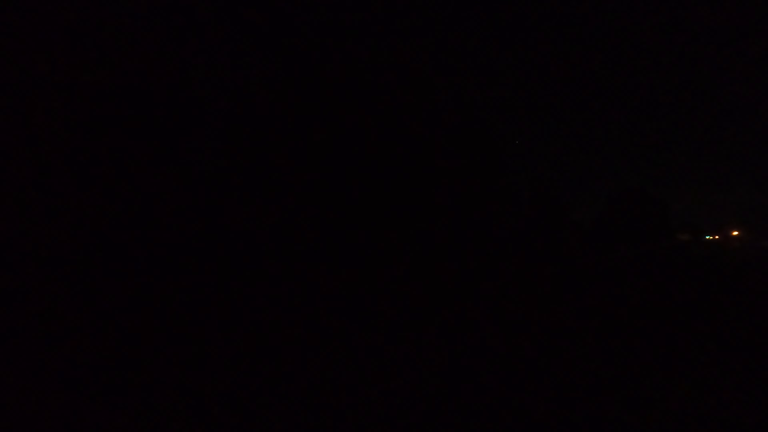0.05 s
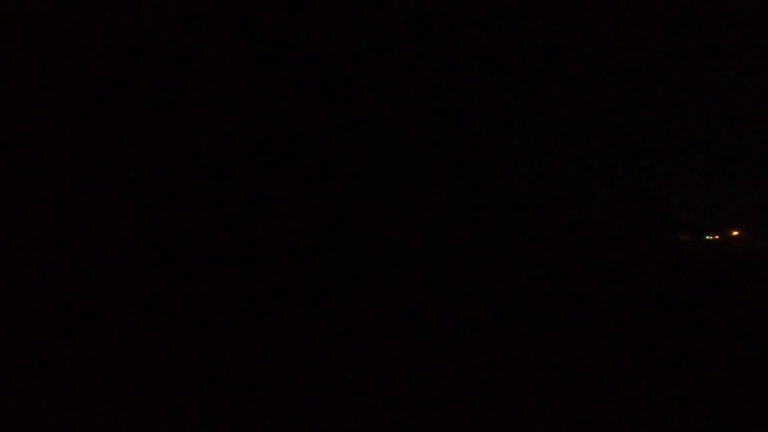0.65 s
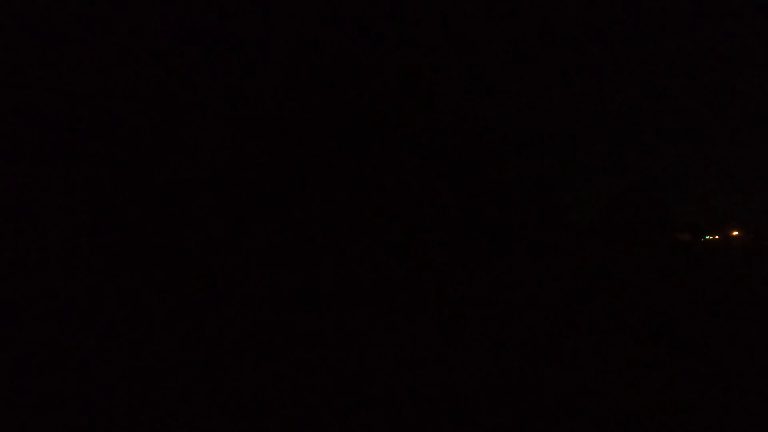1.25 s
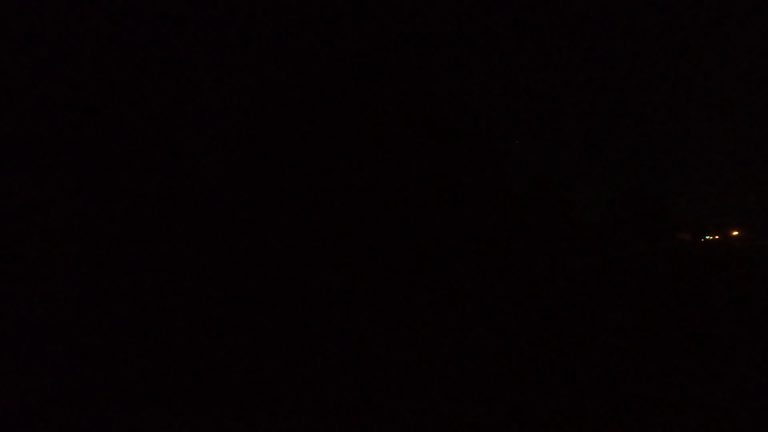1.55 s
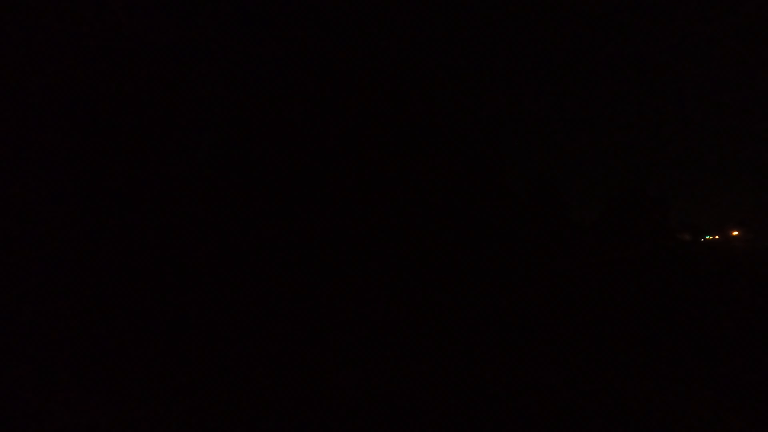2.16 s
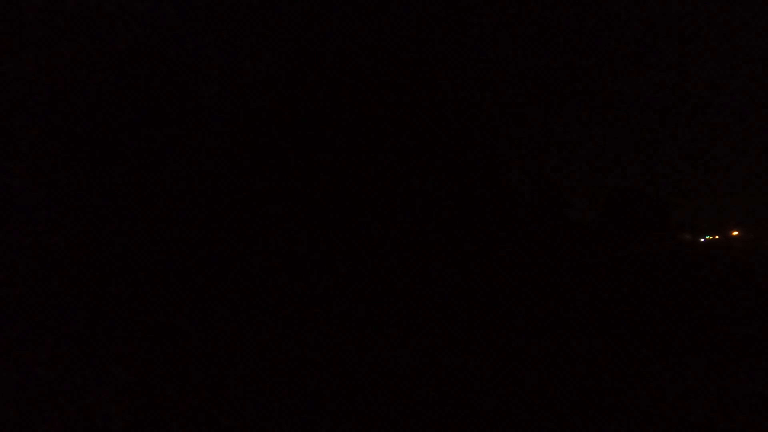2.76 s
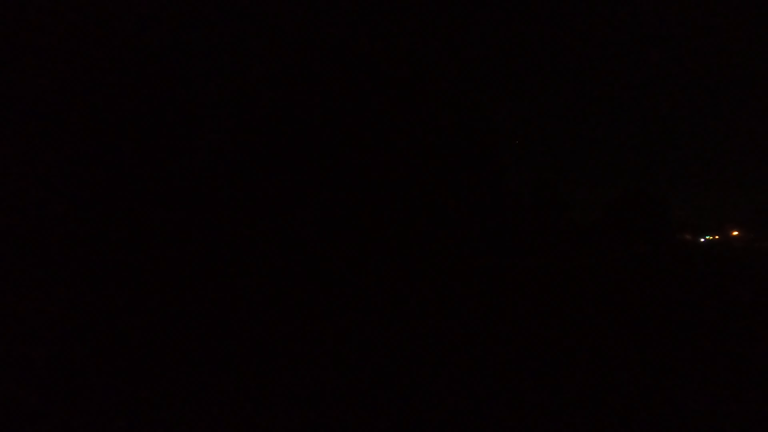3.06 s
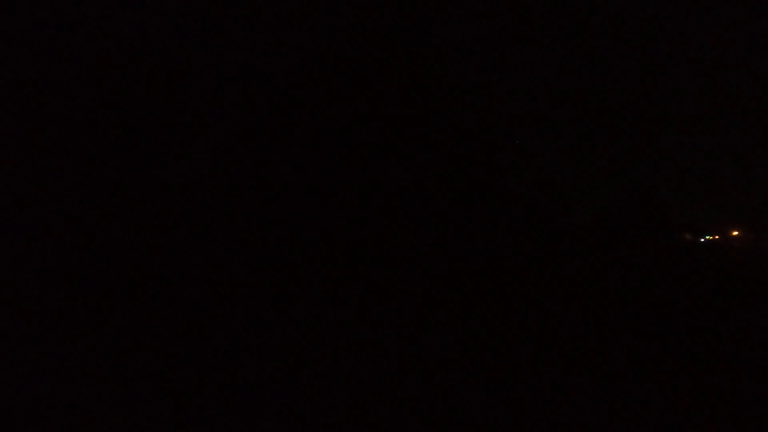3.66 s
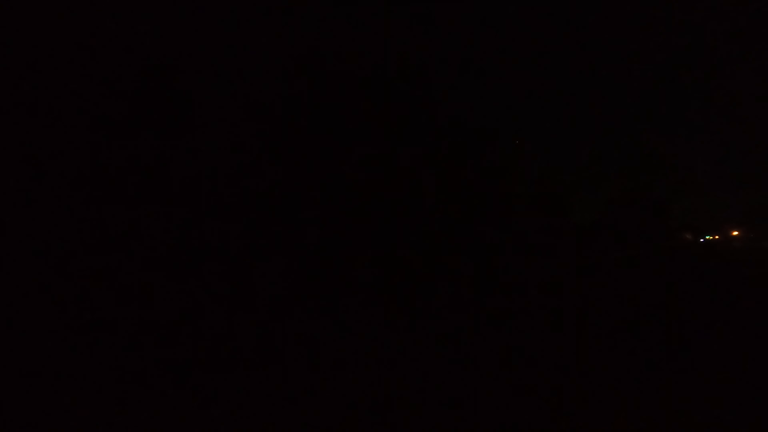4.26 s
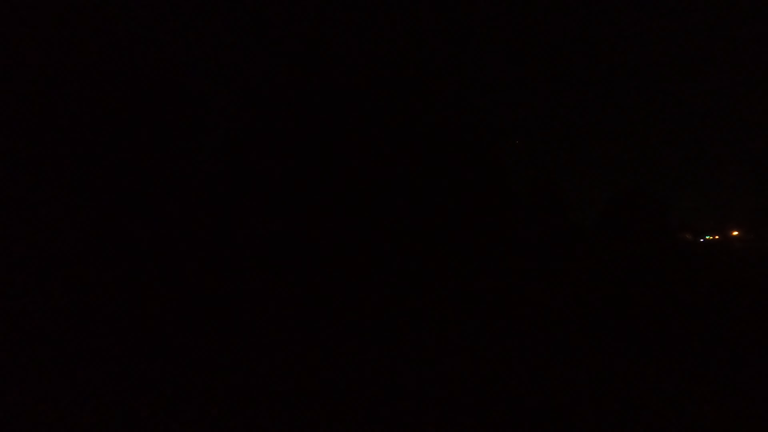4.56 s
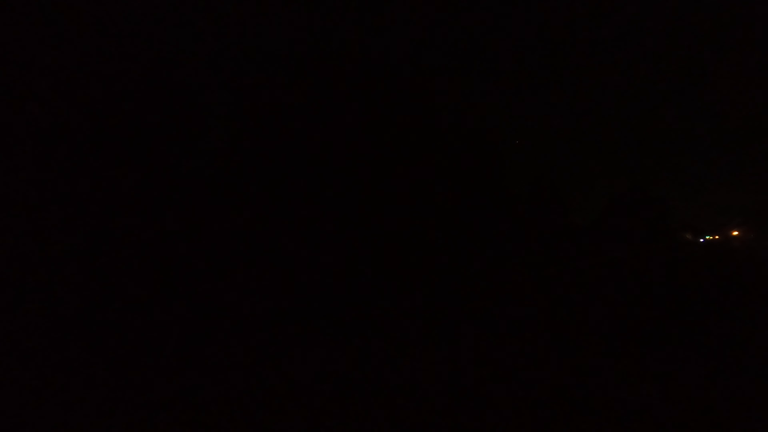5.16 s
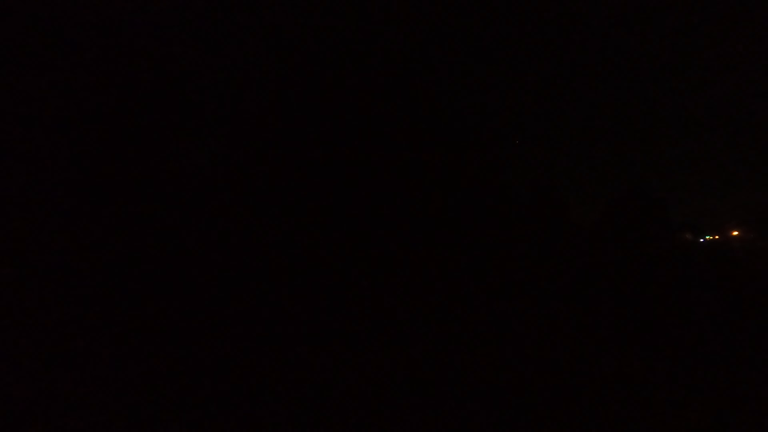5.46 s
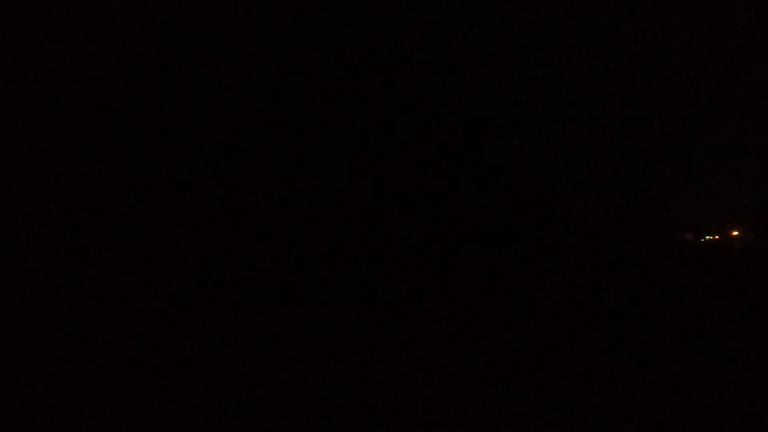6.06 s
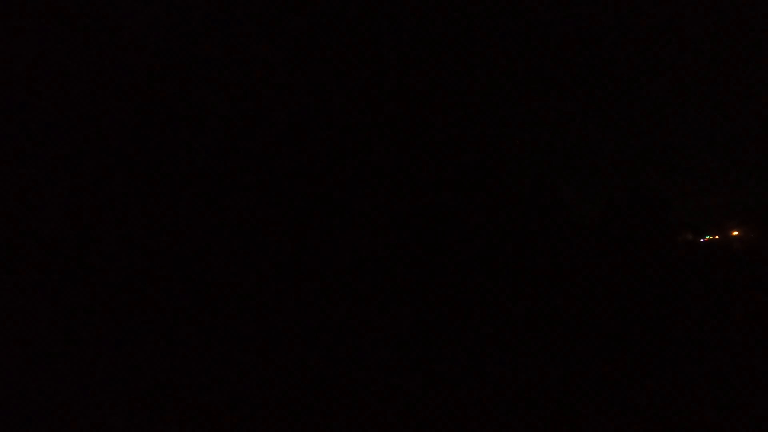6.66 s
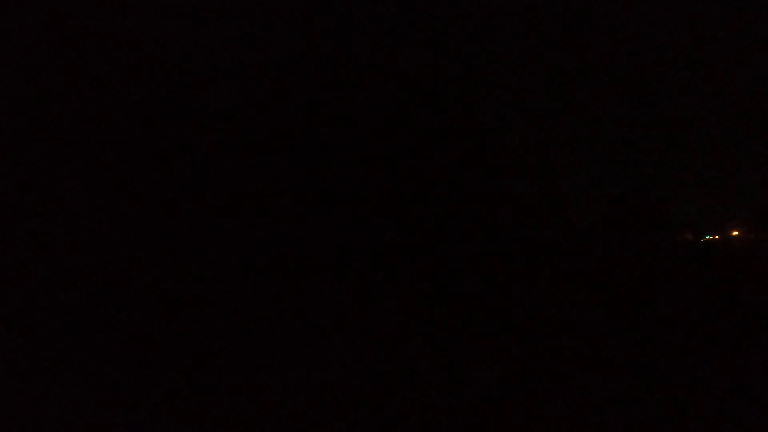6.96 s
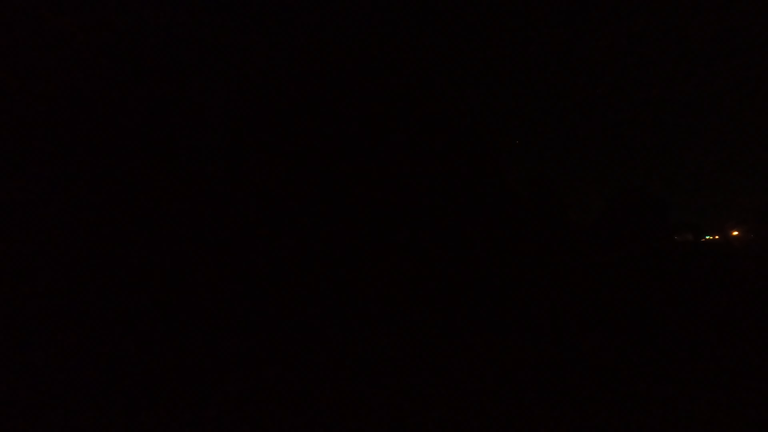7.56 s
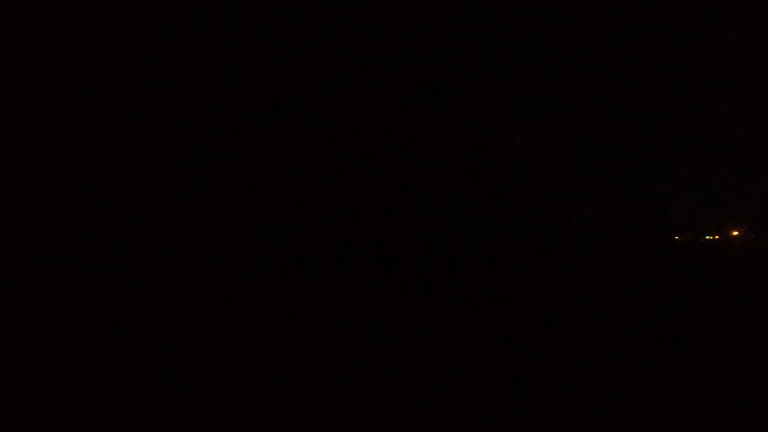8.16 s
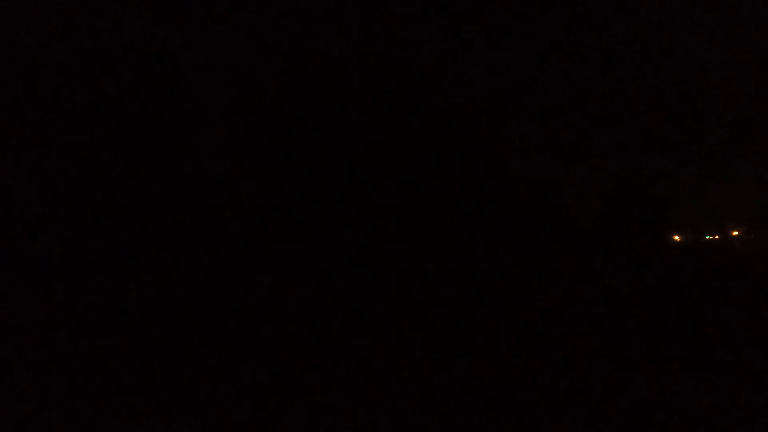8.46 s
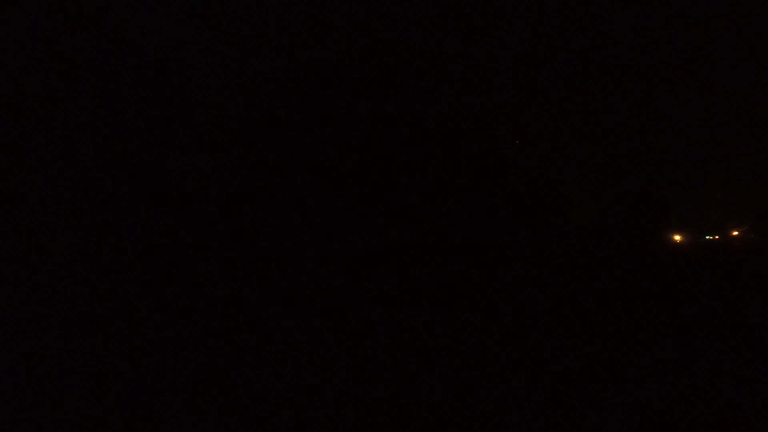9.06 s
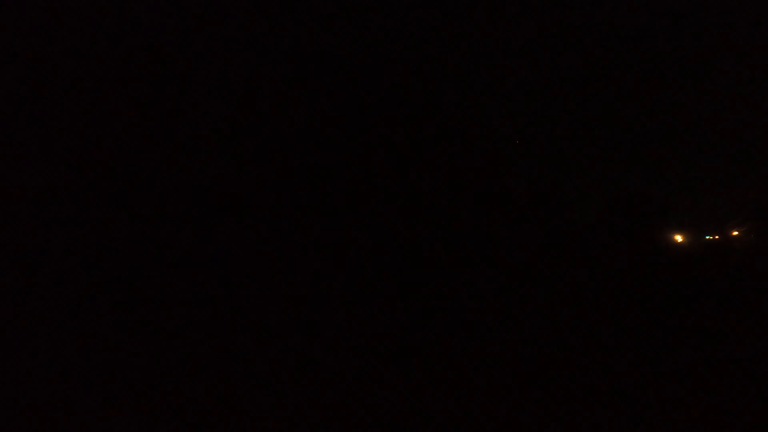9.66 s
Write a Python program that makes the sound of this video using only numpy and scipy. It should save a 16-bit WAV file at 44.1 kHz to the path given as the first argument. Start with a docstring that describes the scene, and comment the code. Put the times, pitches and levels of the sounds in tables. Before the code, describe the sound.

A far train rumbles and hums while the rails hiss ever louder and several crickets chirp in the night.

```python
"""Open country at night: crickets sing while a distant train approaches.
The ground rumbles, wheels roar and moan, engine hum and a far drone fade; the rails hiss ever louder.
Crickets scrape wing on wing: a throbbing far chorus, a faint singer, a near one with long chirps,
and later a raspy one in a quick beat. A faint high sizzle builds; electronics add a thin whine."""
import sys
import numpy as np
from scipy import signal
from scipy.fft import rfft, irfft, next_fast_len
from scipy.io import wavfile

SR = 44100
rng = np.random.default_rng(int(sys.argv[2]) if len(sys.argv) > 2 else 0)


def wav_record(signal):
    """Record a signal, one row per channel, as 16-bit PCM in the file named by sys.argv[1]."""
    frames = np.transpose(np.atleast_2d(signal))
    bounded = np.clip(frames, -1, 1)
    # unit amplitude maps onto the largest positive 16-bit level
    quanta = np.round(bounded * 32767).astype(np.int16)
    wavfile.write(sys.argv[1], SR, quanta)


N = 432621
T = np.arange(N) / SR


def amp(db):
    return 10 ** (np.asarray(db) / 20)


def unit_rms(x):
    return x / np.sqrt(np.mean(abs(x) ** 2) + 1e-24)


def at_hz(points, hz):
    """Curve interpolated on a log-frequency axis."""
    f, value = np.transpose(points)
    return np.interp(np.log(hz + 1), np.log(f + 1), value)


def gain_curve(points):
    """Gain over time, interpolated in dB."""
    times_s, db = np.transpose(points)
    return amp(np.interp(T, times_s, db))


def add(mix, start_s, sound):
    part = mix[max(round(start_s * SR), 0):][:len(sound)]
    part += sound[:len(part)]


def bins_hz():
    """FFT frequencies, padded for tails."""
    return np.fft.rfftfreq(2 * next_fast_len(N // 2 + SR // 2), 1 / SR)


def complex_noise(*shape):
    return rng.standard_normal((*shape, 2)) @ [1, 1j]


def wander(width_hz, t=T):
    """Slow complex random signal of unit power."""
    count = 8192
    hz = np.fft.fftfreq(count, T[-1] / count)
    slow = np.fft.ifft(complex_noise(count) * np.exp(-(hz / width_hz) ** 2))
    return np.interp(t, np.linspace(0, T[-1], count), unit_rms(slow))


def tone(hz, width_hz, t=T, steady=.55):
    """Wavering tone near unit power; steady (0-1) evens out its loudness."""
    waver = wander(width_hz, t)
    waver /= np.sqrt(np.clip(steady * abs(waver) ** 2 + 1 - steady, .05, None))
    phase = 2 * np.pi * np.cumsum(hz * np.ones(len(t))) / SR
    return np.sqrt(2) * (waver * np.exp(1j * phase)).real


# Coherence of the two microphone ports: f/Hz, coherence/0-1
PORT_COHERENCE = [(50, 0.99), (200, 0.96), (500, 1), (1000, 0.87), (1400, .88), (1800, 1), (3300, 0.91),
                  (3900, 0.96), (6500, 0.3)]

def noise(spectrum, modes=(), coherence=PORT_COHERENCE):
    """Partly coherent stereo noise of unit RMS, shaped by a spectrum and resonances."""
    hz = bins_hz()
    modes_db = sum(db / (1 + (2 * (hz - mode_hz) / width_hz) ** 2) for mode_hz, width_hz, db in modes)
    left, other = complex_noise(2, len(hz))
    shared = np.clip(at_hz(coherence, hz), 0, 1)
    right = shared * left + np.sqrt(1 - shared ** 2) * other
    return unit_rms(irfft(np.array([left, right]) * amp(at_hz(spectrum, hz) + modes_db))[:, :N])


def scatter(x, t60_s, delay_s, channels=2):
    """Diffuse echoes off ground and plants, drifting between two sets of paths."""
    t = np.arange(0, delay_s + t60_s, 1 / SR)
    out = 0
    for drift in (np.cos(T), np.sin(T)):
        tail = rng.standard_normal((channels, len(t))) * amp(-60 * t / t60_s) * (t > delay_s)
        wet = signal.oaconvolve(x[None], tail, axes=1)[:, :N]
        out += drift * wet * np.std(x) / np.std(wet, axis=1, keepdims=True)
    return out


# Air and microphone hiss: f/Hz, relative level/dB
AIR_SPECTRUM = [(300, -2.5), (1000, 0), (1500, -1.5), (1900, 0.5), (2500, -11.5), (4200, -17.5),
                (5000, -15.5), (5900, -19.5), (6900, -19), (7600, -19.5), (8000, -29.5), (8400, -56.5)]

def night_air(level_db=-61):
    """Steady hiss of still air and microphone."""
    return amp(level_db) * noise(AIR_SPECTRUM, coherence=[(500, .87), (1400, .66), (3000, .98), (5500, .14)])


# Wheel moans: start/s, end/s, start f/Hz, end f/Hz, width/Hz, level/dB
WHEEL_MOANS = [(0, 1.07, 485, 496, 19, -48.5), (0.5, 1.07, 570, 554, 18, -53.5),
               (1.05, 1.72, 497, 498.6, 14, -49), (1.5, 1.82, 450, 435, 6.5, -47),
               (2.3, 2.6, 470, 550, 16, -53), (1.701, 2.5, 490, 550, 28, -59),
               (0.8, 1.45, 917, 917, 21, -66.5), (.1, 1.36, 1000, 1029, 31, -69.5),
               (4, 10.2, 690.6, 710, 34, -64.5), (4.501, 7, 1330, 1320, 62, -65.5)]

def wheel_moans():
    """Far wheels moan in wavering tones, most gliding in pitch."""
    out = np.zeros(N)
    for start_s, end_s, start_hz, end_hz, width_hz, db in WHEEL_MOANS:
        t = T[(T > start_s) & (T < end_s)]
        fade = np.sqrt(abs(np.sin(np.pi * (t - start_s) / (end_s - start_s))))
        glide_hz = np.linspace(start_hz, end_hz, len(t))
        add(out, start_s, amp(db) * fade * tone(glide_hz, width_hz, t, steady=.53))
    return out


# Engine partials: f/Hz, width/Hz, level/dB
HUM_PARTIALS = [(93.56, 2, -39), (112.1, 2, -43.5), (171.8, 4.3, -53.5), (217.8, 12, -50)]
# Engine fade: t/s, gain/dB
HUM_GAIN = [(0, -.5), (1.1, -1.3), (2.5, -6.5), (3.3, -3), (4.2, -3.5), (5, -5.5), (6.2, -7.5), (7.4, -10),
            (8.3, -13.5), (9.8, -10.5)]

def engine_hum():
    """The engine's low partials fade unevenly."""
    partials = sum(amp(db) * tone(hz, width_hz, steady=.75) for hz, width_hz, db in HUM_PARTIALS)
    return gain_curve(HUM_GAIN) * partials


# Ground rumble: f/Hz, relative level/dB
RUMBLE_SPECTRUM = [(10, -28), (22, -6), (32, -3.5), (42, 1), (65, -2.5), (80, -8), (97, -11), (125, -22),
                   (150, -27), (220, -49.5), (400, -120)]
# Heave of the rumble: t/s, level/dB
RUMBLE_HEAVE = [(0, -33.5), (1, -34), (2.3, -34.5), (2.75, -39), (3.1, -33), (3.8, -35.5), (4.4, -33),
                (5.6, -34.5), (6.2, -33.5), (7.2, -35), (7.9, -32.5), (8.7, -34), (9.8, -31.5)]

def ground_rumble():
    """The ground rumble heaves as the train nears."""
    return gain_curve(RUMBLE_HEAVE) * noise(RUMBLE_SPECTRUM)


# Wheel roar: f/Hz, relative level/dB
ROAR_SPECTRUM = [(90, -18), (140, -1.5), (205, 1.5), (260, -2.5), (330, -5), (480, -9), (600, -14),
                 (800, -22.5), (1200, -28), (2500, -45)]

def wheel_roar(start_db=-43.5, fall_db_per_s=.26):
    """Low roar of rolling wheels, easing slightly."""
    return amp(start_db - fall_db_per_s * T) * noise(ROAR_SPECTRUM + [(6000, -100)])


# Train drone: f/Hz, relative level/dB
DRONE_SPECTRUM = [(200, -19.5), (310, 2), (400, -2.5), (480, 4), (560, -8.5), (640, -6), (800, -22),
                  (1200, -29), (2000, -51)]

def far_drone(start_db=-47.5, hold_s=1.5, fall_db_per_s=6.5, floor_db=-66.5):
    """The train's drone holds, then dies to a faint trace."""
    dying = amp(start_db - fall_db_per_s * np.maximum(T - hold_s, 0))
    return np.hypot(dying, amp(floor_db)) * noise(DRONE_SPECTRUM + [(6000, -100)])


# Rail hiss: f/Hz, relative level/dB
RAIL_SPECTRUM = [(500, -8.5), (900, -6.5), (1350, -4.5), (1600, -5), (2050, 1.5), (2500, -2.5), (3000, -6),
                 (3550, 1.5), (3950, 0), (4150, -7), (4600, -15.5), (5000, -15.5), (5800, -24), (6500, -23),
                 (7200, -31), (7900, -35), (8400, -74)]
# Rail resonances: f/Hz, width/Hz, boost/dB
RAIL_RESONANCES = [(1785, 120, 6), (2690, 120, 6), (3540, 96, 3), (6600, 200, 4.5)]

def rail_hiss(start_db=-64, rise_db=23, rise_tau_s=8.7, flicker_db=1):
    """Steel carries rolling noise ahead of the train; it grows fast, then more slowly."""
    nearing_db = start_db + rise_db * (1 - np.exp(-T / rise_tau_s))
    gain = amp(nearing_db + flicker_db * wander(width_hz=13).real)
    return gain * noise(RAIL_SPECTRUM, RAIL_RESONANCES)


# Swells of the rail ring: centre/s, length/s, boost/dB
RAIL_SWELLS = [(3.3, 0.32, 9), (5.5, .3, 3.5), (7.15, .2, 4), (7.422, .3, 5), (8.27, .35, 7), (9.1, .35, 3),
               (9.68, 0.19, 5.5)]

def rail_ring(hz=3895, start_db=-73, rise_db_per_s=1.72, waver_db=1):
    """The rails ring in a high band that grows and swells."""
    swell_db = sum(db * np.exp(-(2 * (T - centre_s) / length_s) ** 2)
                   for centre_s, length_s, db in RAIL_SWELLS)
    gain = amp(start_db + rise_db_per_s * T + swell_db + waver_db * wander(width_hz=3).real)
    return gain * tone(hz, width_hz=65, steady=.066)


# Massed far crickets: f/Hz, relative level/dB
CHORUS_SPECTRUM = [(1500, -61.5), (2600, -25), (2950, -11.5), (3200, -2.5), (3450, 0), (3700, -2),
                   (3930, -10), (4100, -25), (4400, -37), (8000, -81)]

def cricket_chorus(level_db=-57.5, throb_db=1.5, peak_s=.11, period_s=.344, in_step_s=9, wing_hz=41):
    """Far crickets merge into a fluttering band; its throb fades as they drift out of step."""
    flutter = 1 + .17 * np.sin(2 * np.pi * wing_hz * T + 2 * wander(width_hz=4.1).real)
    in_step = np.exp(-(T / in_step_s) ** 4)
    throb = in_step * np.cos(2 * np.pi * (T - peak_s) / period_s)
    return amp(level_db + throb_db * throb) * flutter * noise(CHORUS_SPECTRUM)


# Far cricket chirps: start/s, end/s, level/dB
FAR_CRICKET_CHIRPS = [(.64, 1.0, -66), (3.08, 3.5, -67), (5.545, 5.97, -65.5), (7.849, 8.197, -64)]

def far_cricket(hz=4295, wing_hz=40, fade_s=.05):
    """Long chirps blurred by distance."""
    gate = sum(amp(db) * np.clip(np.minimum(T - start_s, end_s - T) / fade_s, 0, 1)
               for start_s, end_s, db in FAR_CRICKET_CHIRPS)
    flutter = 1 + .38 * np.sin(2 * np.pi * wing_hz * T)
    return gate * flutter * tone(hz, width_hz=74)


def wing_stroke(hz, phase_turns, rise_s, fall_s=.0047, glide=.016, sag=.085, rasp_db=-23, grain_db=-20):
    """The scraper runs along the file: the wing tone swells to a sharp peak, sags in pitch and stops."""
    t = np.arange(-rise_s, fall_s, 1 / SR)
    knots_s = np.r_[rise_s * np.array([-1, -.8, -.4, -.13]), fall_s * np.array([0, .24, .6, 1])]
    swell = np.interp(t, knots_s, [.0092, .36, .4, .7, .94, .9, .33, .056])
    early_drop = glide * np.clip(1.5 + 2 * t / rise_s, 0, 1)
    late_drop = sag * np.maximum(t / fall_s, 0) ** 1.9
    phase = 2 * np.pi * (np.cumsum(hz * (1 - early_drop - late_drop)) / SR + phase_turns)
    tooth_strikes = rng.standard_normal((2, len(t)))
    teeth, grain = unit_rms(signal.fftconvolve(tooth_strikes, np.hanning(SR // 600)[None], "same"))
    wing_tone = (1 + amp(grain_db) * grain) * np.sin(phase)
    rasp = amp(rasp_db) * teeth * np.sin(1.1 * phase)
    return swell * (wing_tone + rasp)


# Echoes off nearby surfaces: delay/s, left/dB, right/dB
SURFACE_ECHOES = [(.00433, -7, -9), (0.0105, -11, -11.5), (0.0154, -9, -9.5), (.078, -20, -18.5)]

def near_paths(song, echo_send, close_db=-5, field_db=-13, left_lag_s=28e-6):
    """Song arrives from the right; surface echoes, close scatter and the field fill its gaps."""
    direct = song * amp([[-.3], [-1.2]])
    echoes = np.zeros((2, N))
    for delay_s, *sides_db in SURFACE_ECHOES:
        for side, db in zip(echoes, sides_db):
            add(side, delay_s, amp(db) * echo_send)
    close = amp(close_db) * scatter(echo_send, t60_s=.11, delay_s=.009, channels=1) * amp([[1], [-2.5]])
    hz = bins_hz()
    lag = np.exp(-2j * np.pi * hz * np.array([[left_lag_s], [0]]))
    near = irfft(rfft(direct + echoes + close, 2 * (len(hz) - 1)) * lag)[:, :N]
    return near + amp(field_db) * scatter(echo_send, t60_s=.6, delay_s=.018)


# Near chirps: first stroke/s, last stroke/s, level before gain/dB, onset cut/dB, warm-up/strokes, echo/dB
NEAR_CHIRPS = [(0.733, 1.04, -43.5, 1.5, 1.1, 0.5), (2.094, 2.375, -44, 2, 1.1, -0.5),
               (3.454, 3.74, -44.5, 2, 0.97, 0.5), (4.884, 5.174, -44, 2, 1.2, 1),
               (6.202, 6.462, -43, 2, 1.1, 0), (7.611, 7.874, -43, 1, 1, -1.5),
               (9.03, 9.276, -50, 11.5, 2.6, -7)]

def near_cricket(hz=4638, ring_hz=4612, stroke_s=.0239, rise_s=.0108, uneven_db=.8, gain_db=-1.7):
    """Chirps of about a dozen uneven wing strokes, the first softer, on a slight arch of pitch."""
    song, echo_send = np.zeros((2, N))
    for first_s, last_s, db, onset_cut_db, warm_strokes, echo_db in NEAR_CHIRPS:
        slip_turns = 0  # wing phase slips from stroke to stroke
        count = round((last_s - first_s) / stroke_s) + 1
        for k, due_s in enumerate(np.linspace(first_s, last_s, count)):
            detune, late, slip, force = rng.standard_normal(4)
            softness = np.exp(-(k / warm_strokes) ** 2)
            peak_s = due_s + .0004 * late
            slip_turns += .28 * slip
            arch = np.sin(np.pi * (due_s - first_s) / (last_s - first_s))
            pitch_hz = hz * (1 + .004 * arch - .004 * softness + .0021 * detune)
            stroke = wing_stroke(pitch_hz, ring_hz * peak_s + slip_turns, rise_s)
            stroke *= amp(db + gain_db - onset_cut_db * softness + uneven_db * force)
            add(song, peak_s - rise_s, stroke)
            add(echo_send, peak_s - rise_s, amp(echo_db) * stroke)
    return near_paths(song, echo_send)


# High sizzle: f/Hz, relative level/dB
SIZZLE_SPECTRUM = [(11500, -44.5), (13200, -16), (14000, -5.5), (14800, 0.5), (15200, -3), (15700, -1),
                   (16500, -30.5)]
# Build-up of the sizzle: t/s, level/dB
SIZZLE_BUILD = [(0, -116), (1.5, -108), (2.6, -99), (5.5, -99), (9.8, -95)]

def sizzle(flicker_db=2.5):
    """A very high flickering sizzle, perhaps small insects, builds up."""
    gain = gain_curve(SIZZLE_BUILD) * amp(flicker_db * wander(width_hz=9).real)
    return gain * amp([[-1.5], [1.5]]) * noise(SIZZLE_SPECTRUM, coherence=[(12000, .7), (16000, .7)])


# Pips in the rail hiss: t/s, level/dB
RAIL_PIPS = [(3.13, -58), (3.38, -56), (3.42, -56.5), (5.603, -55), (5.655, -56), (5.97, -57), (7.75, -53),
             (8.528, -53), (9.036, -53), (9.136, -54), (9.437, -54)]

def rail_pips(hz=1780, length_s=.04):
    """Faint pips at the lowest rail resonance."""
    out = np.zeros(N)
    t = np.arange(0, length_s, 1 / SR)
    for centre_s, db in RAIL_PIPS:
        pip = np.hanning(len(t)) * tone(hz, width_hz=15, t=t, steady=.85)
        add(out, centre_s - length_s / 2, amp(db) * pip)
    return out


# Raspy chirps: last stroke/s, level before gain/dB
RASPY_CHIRPS = [(3.659, -45), (3.954, -47), (4.265, -45.5), (4.556, -46), (4.825, -45.5), (5.077, -45),
                (5.419, -46.5), (5.663, -46.5), (5.987, -45.5), (6.279, -45), (6.554, -44.5),
                (6.835, -45.5), (7.147, -47.5), (7.419, -45), (7.740, -46), (8.083, -46.5), (8.444, -47),
                (8.722, -48), (9.117, -46), (9.463, -47.5), (9.759, -46.5)]

def raspy_cricket(hz=3470, stroke_s=.0235, length_s=.022, sweep=.322, grit=.32, wet_db=-8, gain_db=-.7):
    """Chirps of five wing strokes of growing strength, each a gritty tone sliding steeply down."""
    song = np.zeros(N)
    t = np.arange(0, length_s, 1 / SR)
    for last_s, db in RASPY_CHIRPS:
        for remaining in range(5):
            detune, late, force = rng.standard_normal(3)
            pitch_hz = hz * (1 + .01 * detune + sweep * (.5 - t / length_s))
            carrier = np.exp(2j * np.pi * np.cumsum(pitch_hz) / SR)
            teeth = unit_rms(signal.fftconvolve(complex_noise(len(t)), np.hanning(SR // 250), "same"))
            stroke = (unit_rms(1 + grit * teeth) * carrier).real * np.hanning(len(t))
            onset_cut_db = 3 * (remaining / 4) ** 3
            centre_s = last_s - remaining * stroke_s + .0004 * late
            add(song, centre_s - length_s / 2, amp(db + gain_db - onset_cut_db + .53 * force) * stroke)
    return song + amp(wet_db) * scatter(song, t60_s=.16, delay_s=.0073, channels=1)


# Phase between the ports: f/Hz, left lead/rad
PORT_LEAD = [(30, 0.05), (400, -.1), (900, -.7), (1400, -.75), (1650, -.1), (2300, -1.2), (3300, -1.25),
             (4200, -2.1), (6300, -4.3)]
# Shading between the ports: f/Hz, left minus right/dB
PORT_SHADING = [(40, 0.5), (250, -0.6), (600, 1.2), (1000, -2), (1400, -5), (1750, 1), (2100, 3.5),
                (2550, 1), (3500, 4.5), (4200, 5.5), (6500, -1.5)]

def microphone_ports(x):
    """Sound from ahead reaches the two ports with different delay and shading."""
    hz = bins_hz()
    left = amp(at_hz(PORT_SHADING, hz) / 2) * np.exp(1j * at_hz(PORT_LEAD, hz) / 2)
    return irfft(rfft(x, 2 * (len(hz) - 1)) * np.array([left, 1 / left]))[:, :N]


def scene():
    """Air, train, rails and farther crickets ahead, plus the near cricket and the sizzle."""
    air = night_air()
    train = wheel_moans() + engine_hum() + ground_rumble() + wheel_roar() + far_drone()
    rails = rail_hiss() + rail_ring() + rail_pips()
    crickets = cricket_chorus() + raspy_cricket() + far_cricket()
    return microphone_ports(air + train + rails + crickets) + near_cricket() + sizzle()


def electronic_whine(hz=5521.5, buzz_hz=29.7, buzz_depth=.13):
    """Electronics whine, mostly on the left, with a faint octave and a slight buzz."""
    phase = 2 * np.pi * hz * T + np.array([[2.04], [0]])
    fundamental = amp([[-62.2], [-82]]) * np.sin(phase)
    octave = amp([[-98], [-111]]) * np.sin(2 * phase)
    buzz = 1 + buzz_depth * signal.sawtooth(2 * np.pi * buzz_hz * T, .9)
    return np.sqrt(2) * (fundamental + octave) * buzz


def record(dry, cutoff_hz=15800):
    """Adds the whine, softens both ends and limits the band."""
    faded = (dry + electronic_whine()) * signal.windows.tukey(N, .0004)
    lowpass = signal.firwin(255, cutoff_hz, window=("kaiser", 9), fs=SR)
    return signal.oaconvolve(faded, lowpass[None], "same")


dry = scene()
out = record(dry)
wav_record(out)
```